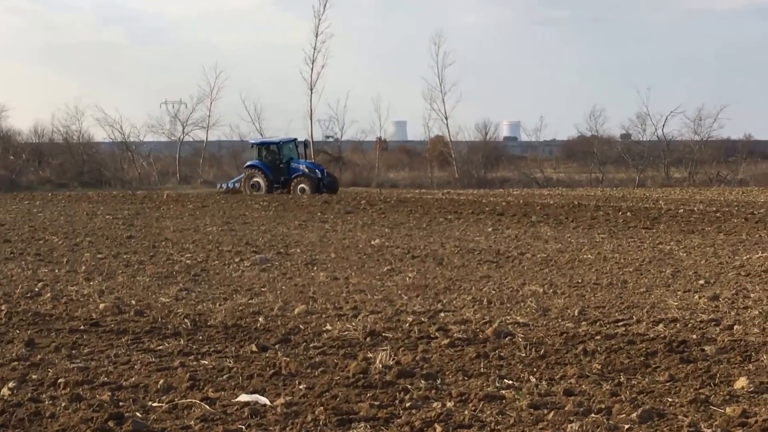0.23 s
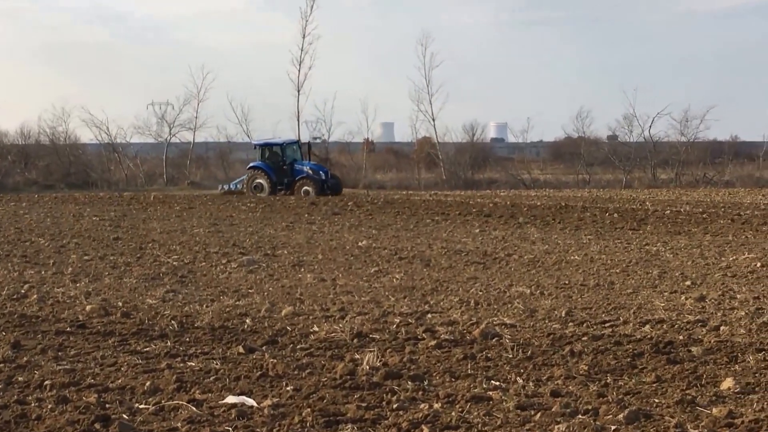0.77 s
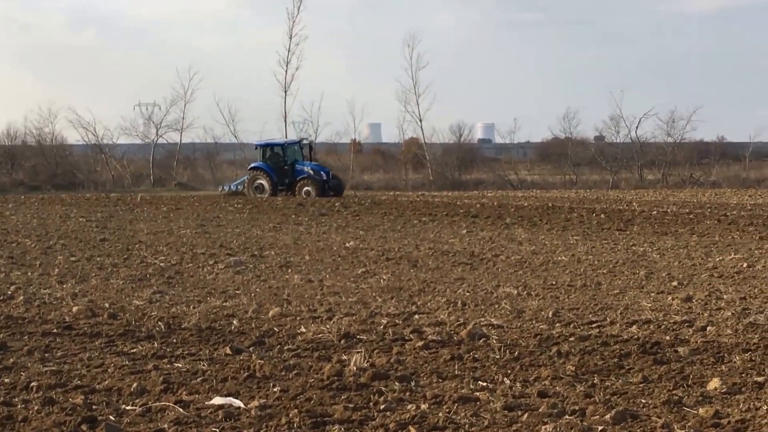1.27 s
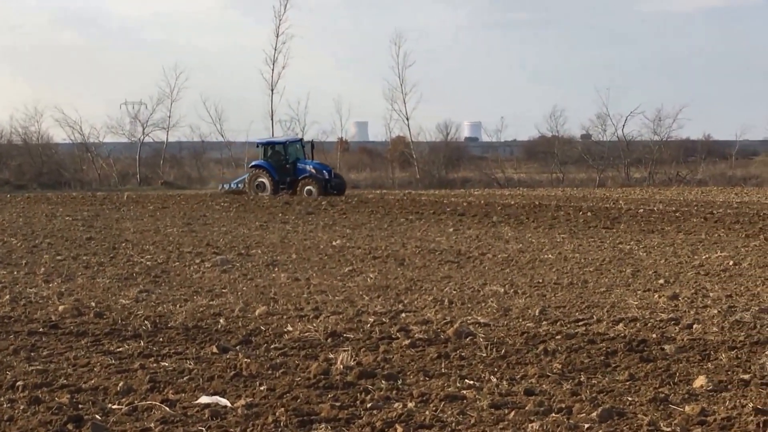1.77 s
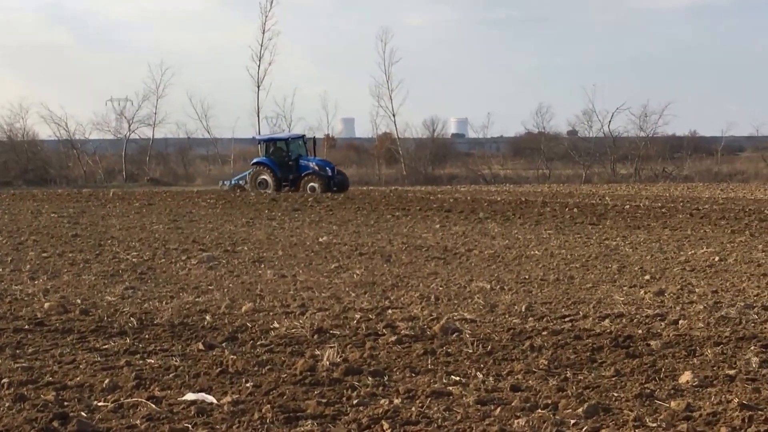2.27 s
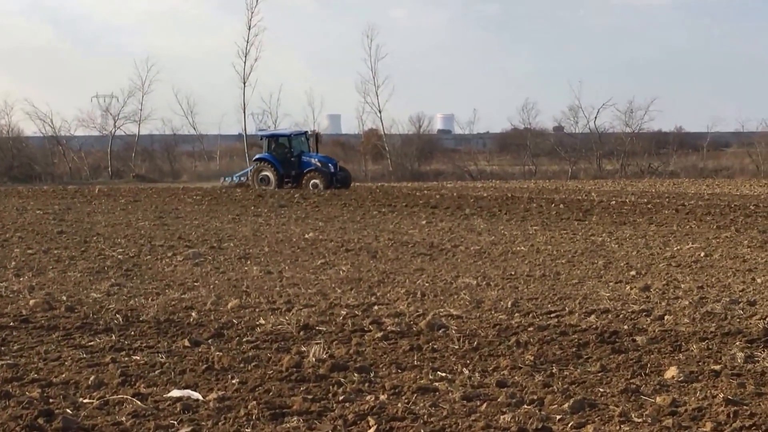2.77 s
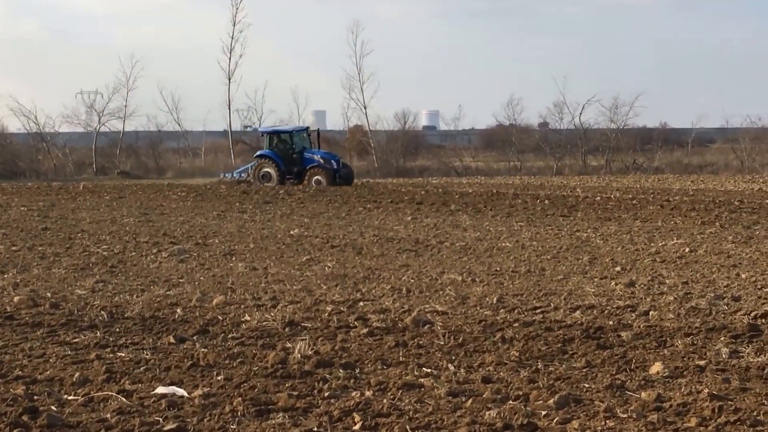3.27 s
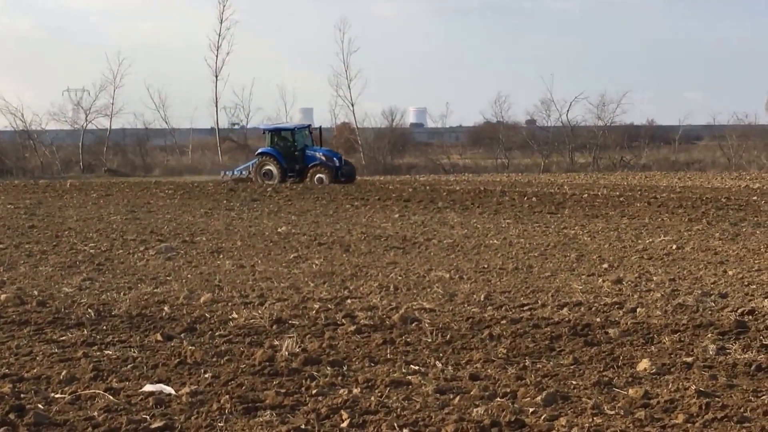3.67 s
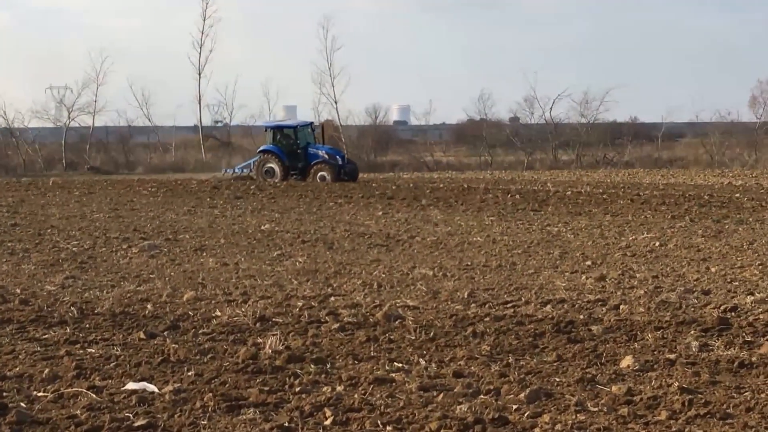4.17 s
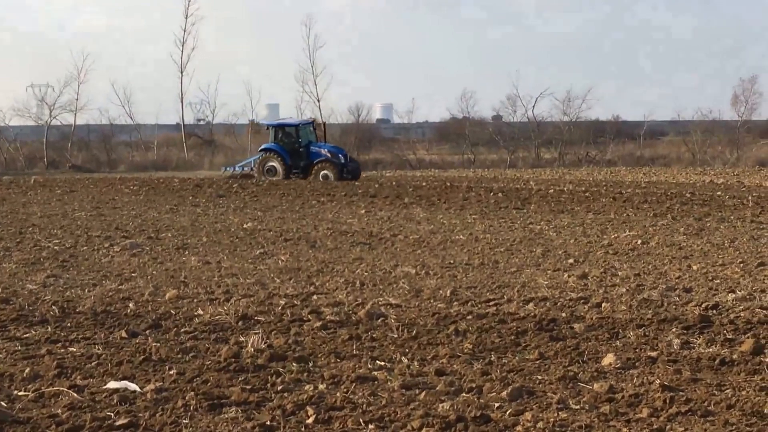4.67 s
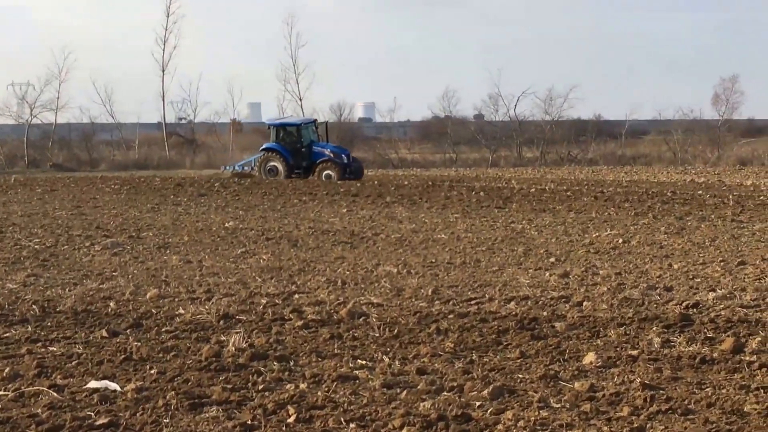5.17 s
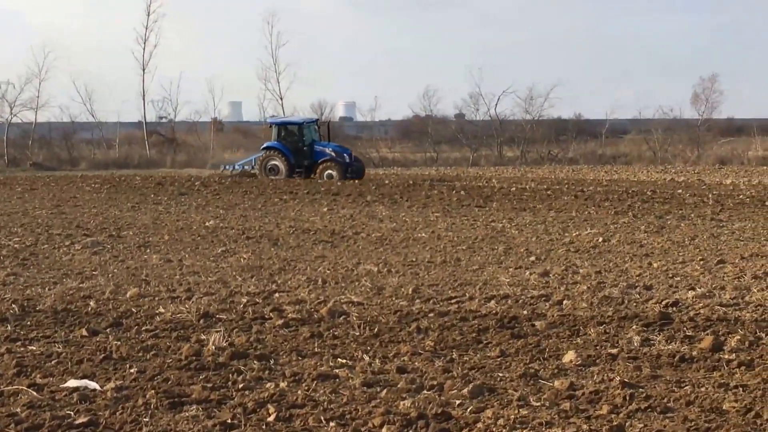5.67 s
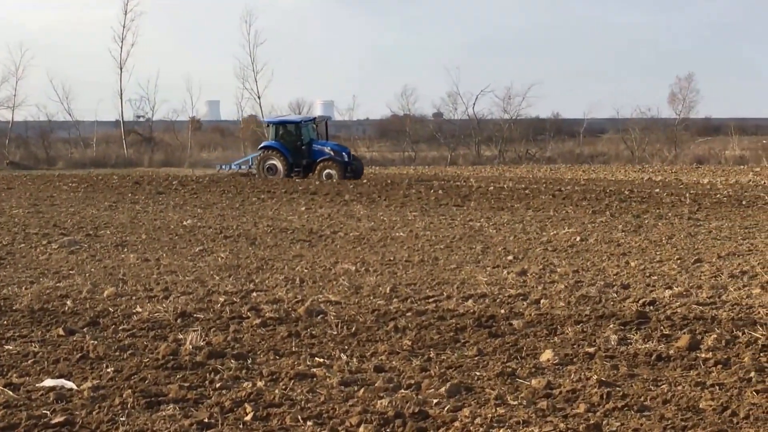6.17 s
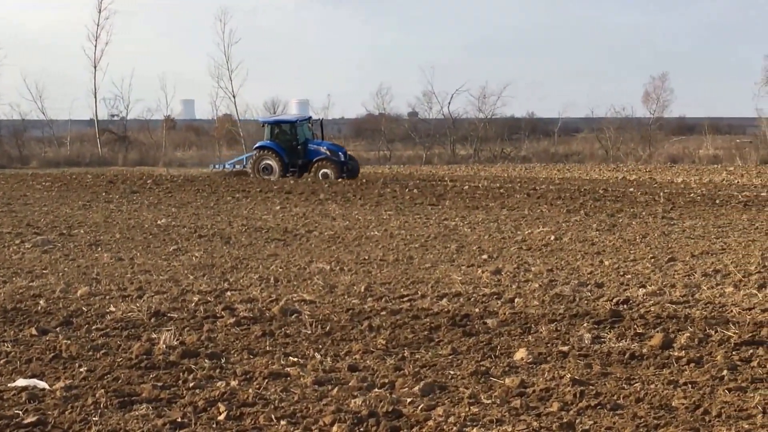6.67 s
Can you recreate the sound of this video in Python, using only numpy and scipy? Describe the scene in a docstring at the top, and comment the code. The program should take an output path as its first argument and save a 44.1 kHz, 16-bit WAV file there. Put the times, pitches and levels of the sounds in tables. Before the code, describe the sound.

One microphone stands in an open field, wind striking it directly, while a tractor pulls a cultivator far off. For all seven seconds the diesel holds one steady speed: fast, fused clatter in the mid range, a higher ticking rasp, and a low drone of roughly 65 firings per second. A thin gear whine wavers, highest at the start. The engine dips slightly around 2 to 3.7 s, lifts briefly near 4 s, and its colour shifts gradually as the tractor turns. Faint gritty hiss from tines in dry soil fades and swells. In front, wind comes in short irregular thumps, flaps and flutters over low rumble, with sharp slaps near 0.9, 1.8 and 2.3 s. Buffeting is thickest from 3 to 6.2 s, strong around 4.2, 4.7, 5.0 and 5.4 s. After 6.3 s it calms, with one weak puff near 6.75 s, leaving the tractor clearer.

```python
"""In an open field, a distant tractor pulls a cultivator while wind hits one nearby microphone.
The diesel's clatter, rasp and ticks are noise shaped by each firing, over a drone of sines.
Wavering sines make the gear whine; gritty filtered noise makes the hiss of tines in dry soil.
The colour shifts as the tractor slowly turns, and moving air makes the treble swell and fade.
Wind is noise in short buffets over a low rumble, with sharp slaps and a faint steady hiss."""
import sys
import numpy as np
from scipy import signal
from scipy.fft import rfft, irfft, next_fast_len
from scipy.io import wavfile
from scipy.ndimage import uniform_filter1d, map_coordinates

SR = 44100
rng = np.random.default_rng(int(sys.argv[2]) if len(sys.argv) > 2 else 0)


def unload_wav(signal):
    """Save mono or channel-first audio to the path in sys.argv[1] as 16-bit WAV at rate SR, clipped to [-1, 1]."""
    wavfile.write(
        sys.argv[1],
        SR,
        np.round(np.clip(np.atleast_2d(signal).T, -1, 1) * 32767).astype(np.int16),
    )


N = 305480
TIME = np.arange(N) / SR  # seconds
FIRING_HZ = 64.9  # average rate of the engine's firings

# treble swelling and fading in moving air, before each layer's gain: (time [s], level [dB])
TREBLE_LEVEL = [(0, -45.5), (.19, -42.5), (.38, -49), (.69, -44.5), (1.0, -48), (1.24, -44.5), (1.38, -49),
                (2.72, -46.5), (3.0, -50.5), (3.4, -47.5), (3.68, -50.5), (4.0, -44), (4.13, -50),
                (4.32, -47.5), (5.25, -45), (6.22, -46), (6.34, -45), (6.93, -44)]
# eddies striking the microphone, before each layer's gain; small ones are bright, large ones dull:
# (start [s], length [s], strength [dB], brightness [dB])
WIND_BUFFETS = [(0.102,0.023,-24.5,-2), (.171,0.026,-21,0.5), (.259,0.053,-24,-1), (0.328,0.056,-21,1),
                (0.464,0.03,-24,0.5), (.657,0.046,-22,-3), (0.795,.024,-24,6.5), (0.884,0.041,-19.5,1),
                (.996,.027,-26.5,2), (1.054,0.056,-23.5,0.5), (1.163,0.019,-24.5,-5), (1.289,0.03,-18,-2),
                (1.489,0.027,-20.5,-1.5), (1.778,0.038,-16.5,-0.5), (1.824,0.046,-22.5,2.5),
                (2.044,0.069,-22.5,0.5), (2.129,0.068,-21,0), (2.205,0.025,-16.5,-1),
                (2.275,0.046,-23.5,2.5), (2.322,.022,-18.5,-3.5), (2.559,0.028,-21,0.5),
                (2.799,0.032,-25.5,-0.5), (2.858,0.066,-22.5,-6), (2.976,0.029,-18.5,1.5),
                (3.013,0.043,-17.5,-0.5), (3.08,.065,-19.5,2), (3.183,0.044,-22,0),
                (3.266,0.096,-20.5,-3.5), (3.382,0.099,-18.5,-0.5), (3.515,0.024,-20,1), (3.647,.075,-21,1),
                (3.764,.027,-24,1.5), (3.882,0.023,-21.5,1.5), (3.981,0.091,-22.5,1.5),
                (4.152,0.062,-24.5,-1.5), (4.221,0.046,-15.5,0.5), (4.281,0.089,-23.5,-.5),
                (4.385,0.1,-20,-2), (4.558,0.098,-18.5,1.5), (4.665,.043,-15,1.5), (4.798,0.024,-26,2),
                (5.019,.043,-16,-0.5), (5.222,0.038,-21.5,2.5), (5.346,0.04,-19.5,3.5),
                (5.442,0.032,-25.5,6.5), (5.621,0.071,-30,0), (5.726,0.063,-17.5,-1), (5.826,0.076,-20,-2),
                (5.918,0.094,-20,1), (6.046,0.046,-23,-7.5), (6.111,0.031,-25,2), (6.163,0.03,-20,-.5),
                (6.746,0.058,-28.5,-2)]


def amp(db):
    """Turn decibels into a gain."""
    return 10 ** (np.asarray(db) / 20)


def unit(x):
    """Scale a signal to an rms (average strength) of 1."""
    return x / np.sqrt(np.mean(x ** 2) + 1e-20)


def curves(rows):
    """Join the points of a table into one smooth-running value per sample for each column after the time."""
    seconds, *columns = np.transpose(rows)
    return [np.interp(TIME, seconds, column) for column in columns]


def wobble(rate):
    """Draw a smooth random curve through rate random points a second."""
    points = rng.standard_normal(int(N * rate / SR) + 4)
    return map_coordinates(points, [TIME * rate])


def filtered(x, response):
    """Multiply each frequency of x by the gain that response gives for it."""
    length = next_fast_len(N + 8192)  # spare room for the filter's tail
    gain = response(np.fft.rfftfreq(length, 1 / SR))
    return irfft(rfft(x, length) * gain, length)[:N]


def coloured(x, spectrum, peaks=()):
    """Give x a broad spectrum with bell-shaped peaks and hollows, at rms 1."""
    table_hz, table_db = np.transpose(spectrum)

    def response(hz):
        level_db = np.interp(np.log(hz + 1), np.log(table_hz), table_db)
        for centre, width, gain_db in peaks:
            level_db = level_db + gain_db * .5 ** ((2 * (hz - centre) / width) ** 2)
        return amp(level_db)

    return unit(filtered(x, response))


def engine(knock_db=-0.7, uneven_db=0.95, clatter_gain_db=1.5, rasp_gain_db=0.0, drone_db=-47, sway_db=0.6):
    """Each firing rattles the block, parts tick between firings, and the exhaust hums at the firing rate."""
    # loudness of the clatter as the tractor turns, before its gain: (time [s], level [dB])
    clatter_level = [(0, -36.5), (.65, -37.5), (1.35, -39.5), (2.6, -40), (3.65, -41.5), (3.95, -36.5),
                     (4.2, -40.5), (5.3, -38), (6.15, -39), (6.8, -36.5)]
    # spectrum of the clatter: (frequency [Hz], relative level [dB])
    clatter_spectrum = [(20, -56), (100, -8.5), (300, -21.5), (600, -4), (850, 0), (1100, 4), (1550, -1),
                        (1750, -3.5), (2300, -7), (2900, -15), (4000, -47), (7000, -120)]
    # spectrum of the higher rasp: (frequency [Hz], relative level [dB])
    rasp_spectrum = [(700, -120), (1500, -29), (2300, 1.5), (2700, -3.5), (2900, 4), (3020, -3.5),
                     (3120, 3), (3600, 0), (4200, -3.5), (4800, -7.5), (5600, -12.5), (8000, -48),
                     (12000, -120)]
    clatter_db, = curves(clatter_level)
    treble_db, = curves(TREBLE_LEVEL)

    firing = 2 * np.pi * np.cumsum(FIRING_HZ * (1 + .005 * wobble(5))) / SR  # phase [radians]
    cycles = firing / (8 * np.pi)  # four firings make one engine cycle
    knock_gain = amp(knock_db * np.cos(firing) + uneven_db * wobble(110))
    knocks = knock_gain * rattle(cycles, repeat=0.26)
    clatter_gain = amp(clatter_db + clatter_gain_db + sway_db * wobble(8))
    clatter = clatter_gain * turning(knocks, clatter_spectrum)

    # injectors and valves tick between firings
    tick_gain = amp(.3 * np.sin(firing) + 0.52 * wobble(110))
    ticks = tick_gain * rattle(cycles, repeat=0.25)
    rasp = amp(treble_db + rasp_gain_db) * over_ground(turning(ticks, rasp_spectrum))

    # the firing tone and three weaker overtones
    drone = unit(sum(amp(-7 * k) * np.sin(k * firing) for k in range(1, 5)))
    return clatter + rasp + amp(drone_db + 2 * wobble(8.2)) * drone


def rattle(cycles, repeat):
    """Mechanical noise, of which a share repeats with every four-stroke cycle."""
    pattern = rng.standard_normal(round(4 * SR / FIRING_HZ))
    locked = pattern[(cycles % 1 * len(pattern)).astype(int)]
    share = np.clip(repeat, 0, 1)
    return np.sqrt(share) * locked + np.sqrt(1 - share) * rng.standard_normal(N)


def turning(x, spectrum):
    """The ring of the engine's panels cross-fades from one side of the tractor to the next."""
    # peaks and hollows heard from each side: (centre [Hz], width [Hz], gain [dB])
    rear = [(1100, 100, 2.5), (1245, 76, -10), (1354, 78, 4.5), (1490, 210, 9), (1700, 140, -2),
            (1964, 240, 10.5), (2820, 420, -4.5), (3690, 1100, 8)]
    rear_quarter = [(1030, 110, 3), (1250, 120, -9.5), (1370, 70, 5.5), (1530, 130, 5.5), (1736, 250, -5.5),
                    (1980, 120, 4.5), (2450, 110, 5.5), (3380, 230, 5), (4190, 520, 5.5)]
    flank = [(1137, 35, 7), (1280, 97, -3), (1530, 79, 6.5), (2400, 120, -6), (2637, 100, 7),
             (2870, 230, -6.5), (3105, 90, 8)]
    full_flank = [(920, 130, -4.5), (1137, 48, 6), (1580, 110, 6), (1723, 25, 9.5), (2710, 120, 6),
                  (3000, 160, -4.5), (3300, 280, 6)]
    front_quarter = [(730, 59, 4), (990, 140, -6), (1158, 38, 4.5), (1295, 56, 5.5), (2470, 230, 2.5),
                     (2730, 170, -2.5), (3500, 220, 3.5)]
    # when each side in turn faces the microphone: time [s]
    facing = [.5, 1.05, 3.8, 5.4, 6.5]
    sides = [rear, rear_quarter, flank, full_flank, front_quarter]
    shares = [np.interp(TIME, facing, row) for row in np.eye(len(sides))]
    return sum(share * coloured(x, spectrum, side) for share, side in zip(shares, sides))


def over_ground(x, echo=0.085, lag_s=0.000708, drift=0.033, patchy_db=1.45):
    """A weak bounce off the soil with a wandering lag combs the treble; turbulent air fades it in patches."""
    lag_samples = lag_s * SR * np.exp(drift * wobble(1.08))
    bounce = map_coordinates(x, [np.arange(N) - lag_samples], order=3)
    both = x + echo * bounce
    bands = signal.stft(both, nperseg=512)[2]
    # random gains smoothed over neighbouring frequencies, then over time
    patches = uniform_filter1d(rng.standard_normal(bands.shape), size=7, axis=0)
    patches = uniform_filter1d(patches, size=36, axis=1)
    faded = signal.istft(bands * amp(patchy_db * unit(patches)), nperseg=512)[1]
    return unit(faded[:N])


def gears(waver=.006, flicker_db=3):
    """Gear meshes sing under load, wavering in pitch and fading in the wind."""
    # gear tones before flicker: (pitch [Hz], level [dB], loudest time [s], spread of the swell [s])
    tones = [(1111, -56, 3.2, 2.3), (1147, -52.5, 5, 4.9), (1336, -48, 1.35, 1.2), (1866, -46, 0.3, 0.32),
             (1750, -61, 6, 1.4), (3095, -57, 4.5, 0.62), (3250, -59.5, 5.3, 0.5)]
    whine = np.zeros(N)
    for hz, db, loudest, spread in tones:
        pitch = hz * (1 + waver * wobble(6) + 0.0067 * wobble(70))
        phase = 2 * np.pi * np.cumsum(pitch) / SR
        swell = np.exp(-.5 * ((TIME - loudest) / spread) ** 2)
        whine += amp(db + flicker_db * wobble(12)) * swell * np.sin(phase)
    return whine


def soil(gain_db=-9, grit_db=0.9, sway_db=1.0, follows=1.1):
    """Tines drag through dry clods: a fine, gritty hiss that swells with the rest of the treble."""
    # spectrum of the hiss: (frequency [Hz], relative level [dB])
    soil_spectrum = [(2000, -120), (3500, -40), (4800, 0), (5500, 1), (6600, 0), (7550, -7.5), (8400, -5),
                     (9800, -11.5), (10400, -17.5), (11000, -13.5), (13000, -21), (15700, -25.5)]
    treble_db, = curves(TREBLE_LEVEL)
    average_db = treble_db.mean()
    hiss_db = average_db + follows * (treble_db - average_db)
    grit = amp(grit_db * wobble(150)) * rng.standard_normal(N)
    level = amp(hiss_db + gain_db + sway_db * wobble(13))
    return level * over_ground(coloured(grit, soil_spectrum))


def hiss(level_db=-69):
    """The microphone's own faint, steady hiss."""
    return amp(level_db) * coloured(rng.standard_normal(N), [(1000, -1.5), (8000, -5.5), (15000, -12)])


def wind(thump_gain_db=1, flap_gain_db=0, flutter_gain_db=-7, rumble_db=-2, stir_db=-10, ripple_db=-21):
    """Large eddies thump slowly, small ones flap and flutter; the breeze stirs weaker ones at random."""
    # the wind between buffets, before each layer's gain: (time [s], level [dB])
    breeze = [(0, -26), (.25, -25.5), (.55, -29.5), (1.2, -26), (1.95, -29.5), (2.37, -21.5), (2.5, -44),
              (2.6, -28), (2.73, -34), (3.1, -20), (3.75, -26.5), (4.1, -25), (4.55, -17.5), (4.9, -27.5),
              (5.55, -23), (5.97, -21), (6.35, -27.5), (6.93, -34.5)]
    # spectra from low to high: (frequency [Hz], relative level [dB])
    thump_spectrum = [(10, -51), (25, -29), (40, -2), (60, 1), (95, 0), (140, -5), (200, -25), (400, -64),
                      (1500, -120)]
    flap_spectrum = [(20, -89), (60, -33.5), (120, -3.5), (165, 2), (260, -2.5), (370, -7.5), (500, -25.5),
                     (900, -44), (3000, -120)]
    flutter_spectrum = [(60, -95), (200, -44), (340, -7), (430, 1), (640, -1.5), (800, -12.5), (1100, -19),
                        (1500, -39.5), (2200, -34), (4000, -57), (12000, -120)]
    breeze_db, = curves(breeze)
    _, _, strength_db, bright_db = np.transpose(WIND_BUFFETS)
    stirring = amp(breeze_db) * fitful(depth_db=5.5, rate=30)

    # brightness takes strength from the thump and adds it to the flutter
    thump_buffets = swells(strength_db - bright_db + thump_gain_db, inset=0)
    flap_buffets = swells(strength_db + flap_gain_db, inset=0.00076)
    flutter_buffets = swells(strength_db + bright_db + flutter_gain_db, inset=0.0013)

    # hypot adds the powers of the buffets and the breeze
    thump = np.hypot(thump_buffets, amp(rumble_db) * stirring)
    flap = np.hypot(flap_buffets, amp(stir_db) * stirring * fitful(depth_db=8, rate=55))
    flutter = np.hypot(flutter_buffets, amp(ripple_db) * stirring * fitful(depth_db=11, rate=78))

    flap_bursts = unit(fitful(depth_db=4.5, rate=120))
    flutter_bursts = unit(fitful(depth_db=8, rate=200))
    return (thump * eddies(thump_spectrum, evenness=0.7)
            + flap * flap_bursts * eddies(flap_spectrum, evenness=0.52)
            + flutter * flutter_bursts * eddies(flutter_spectrum, evenness=0.19))


def fitful(depth_db, rate):
    """A random gain between two limits, as the flow switches between clinging to the port and tearing away."""
    return amp(depth_db * np.tanh(wobble(rate)))


def swells(levels_db, inset):
    """Every buffet rises, holds and falls; inset [s] trims it at both ends."""
    rise_s, fall_s = 0.009, 0.0075  # how fast an eddy arrives and leaves
    power = np.zeros(N)
    for (start, length, *_), db in zip(WIND_BUFFETS, levels_db):
        near = slice(max(0, int((start - .1) * SR)), int((start + length + .1) * SR))
        age = TIME[near] - start
        rise = (1 + np.tanh(2 * (age - inset) / rise_s)) / 2
        fall = (1 + np.tanh(2 * (length - inset - age) / fall_s)) / 2
        power[near] += (amp(db) * rise * fall) ** 2
    return np.sqrt(power)


def eddies(spectrum, evenness):
    """Turbulent pressure of rms 1: swings of random length, with their heights evened out."""
    swirl = coloured(rng.standard_normal(N), spectrum)
    height = np.abs(signal.hilbert(swirl, next_fast_len(N)))[:N]
    return unit(swirl / (height ** 2 + 0.72) ** (evenness / 2))


def slaps(gain_db=-2.0, cycles=0.68, crack_length_s=0.0021):
    """A small eddy snaps across the port: pressure swings that slow as it passes, and a crack."""
    # sharp slaps of air on the microphone port, before gain: (time [s], level [dB], pitch [Hz])
    slap_events = [(.337, -12.5, 560), (.898, -1.5, 560), (1.071, -8.5, 430), (1.791, -4.5, 410),
                   (1.826, -4.5, 596), (2.049, -11.5, 382), (2.19, -6, 497), (2.224, -7, 380),
                   (2.283, -8, 520), (2.359, -1.5, 540), (2.984, -7.5, 460), (3.22, -9.5, 560),
                   (3.303, -5, 322), (3.525, -5, 540), (4.024, -9.5, 425), (4.256, -8, 475),
                   (4.325, -9.5, 557), (4.433, -6, 500), (4.676, -2.5, 412), (4.695, -7, 417),
                   (4.739, -5, 540), (4.819, -9.5, 380), (5.028, -4, 467), (5.048, -3.5, 620),
                   (5.365, -1, 500), (5.631, -6.5, 422), (5.744, -5.5, 404), (5.773, -10.5, 480),
                   (6.017, -9, 580), (6.18, -10.5, 332), (6.237, -16.5, 616)]
    # spectrum of the crack: (frequency [Hz], relative level [dB])
    crack_spectrum = [(100, -95), (500, -8), (950, 1), (1400, -9), (2000, -19.5), (3500, -32.5),
                      (12000, -100)]
    crack_db, crack_grows = -20.5, 1.43  # crack level for a 0 dB table entry; dB of crack per dB of slap
    swings, snaps = np.zeros(N), np.zeros(N)
    for (moment, db, hz), turn in zip(slap_events, rng.random(len(slap_events))):
        near = slice(int((moment - .012) * SR), int((moment + .02) * SR))
        seconds = TIME[near] - moment
        age = seconds * hz  # in cycles
        phase = 2 * np.pi * (age - 0.16 * age * np.clip(age, -3, 3) + turn)
        swings[near] += amp(db + gain_db) * np.sin(phase) / np.cosh(2 * age / cycles)
        snaps[near] += amp(crack_db + crack_grows * db) / np.cosh(seconds / crack_length_s)
    return swings + snaps * eddies(crack_spectrum, evenness=0.3)


def scene():
    """The far tractor and the wind at the microphone, added together."""
    return (engine() + gears() + soil() + hiss() + wind() + slaps())[None]


def record(dry):
    """The recorder thins the deepest rumble and keeps nothing above its band limit."""
    top_hz = 15720
    low_cut = signal.butter(N=2, Wn=30, btype="high", fs=SR, output="sos")
    thinned = signal.sosfilt(low_cut, dry[0])
    return filtered(thinned, lambda hz: hz < top_hz)[None]


dry = scene()
out = record(dry)
unload_wav(out)
```